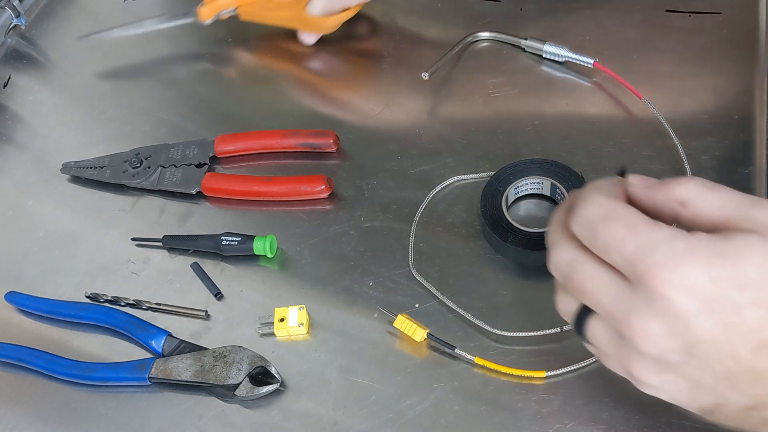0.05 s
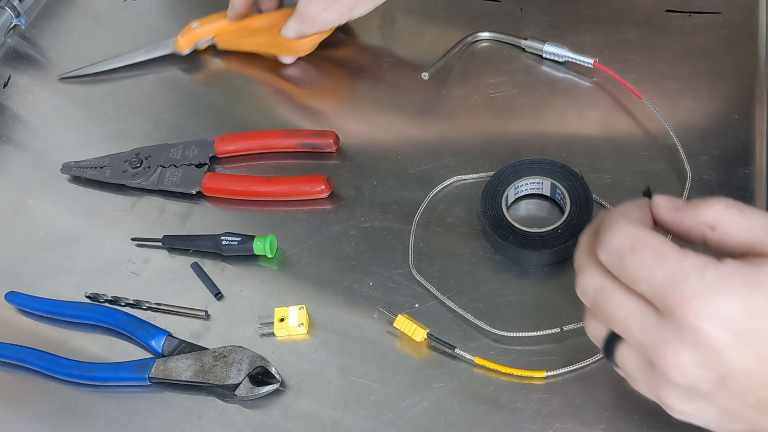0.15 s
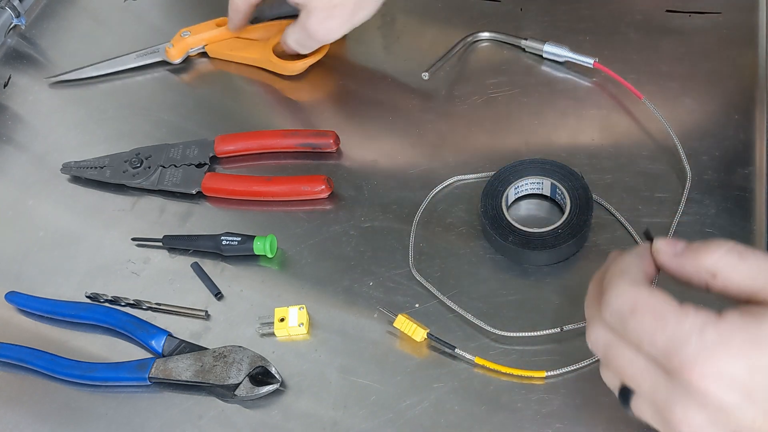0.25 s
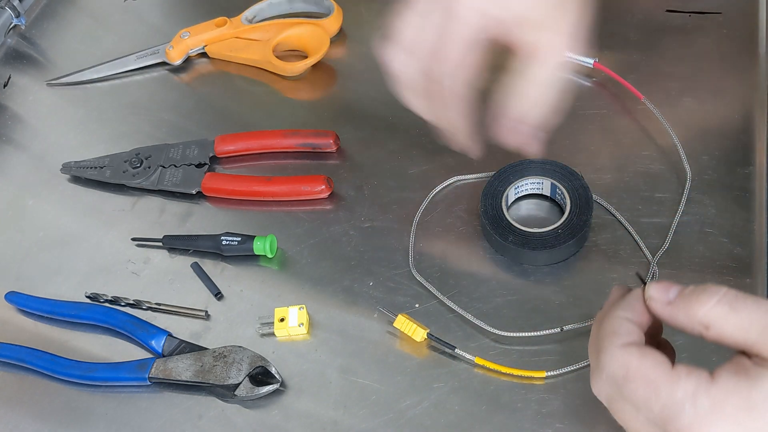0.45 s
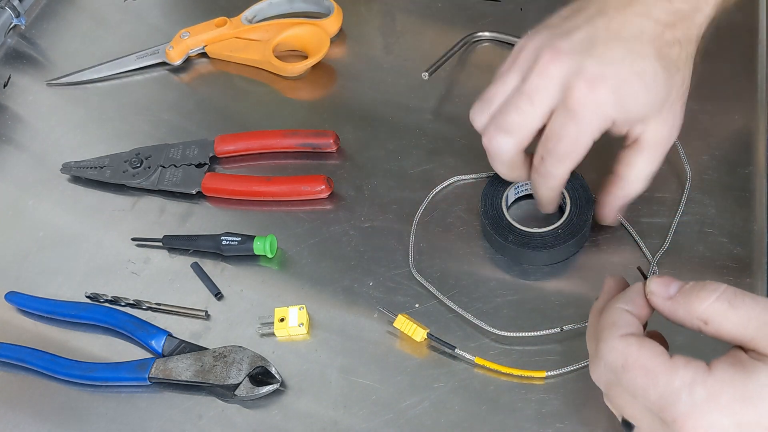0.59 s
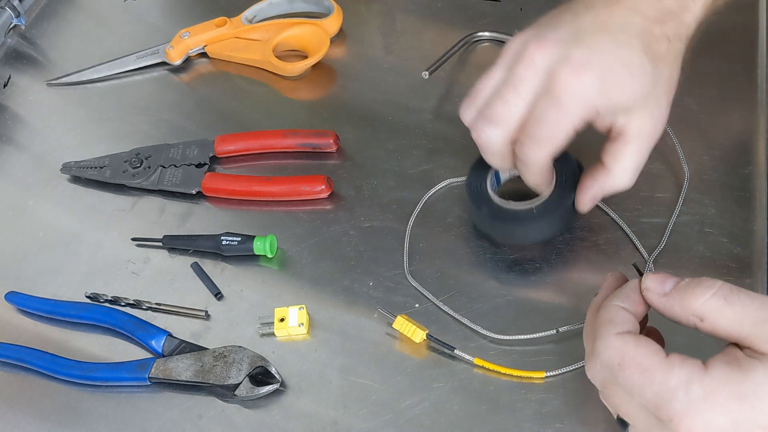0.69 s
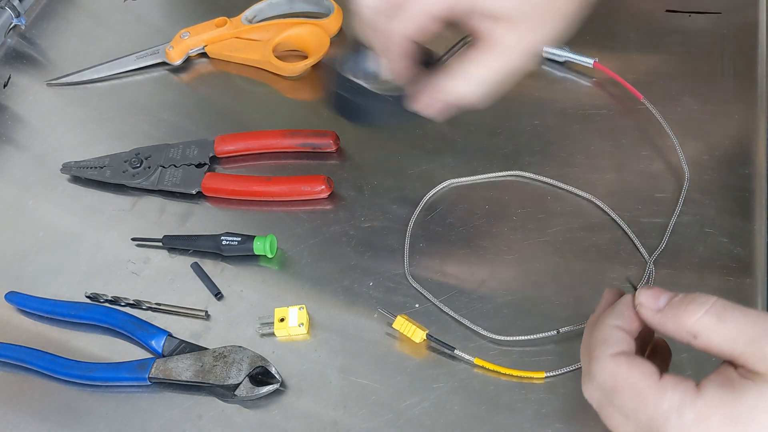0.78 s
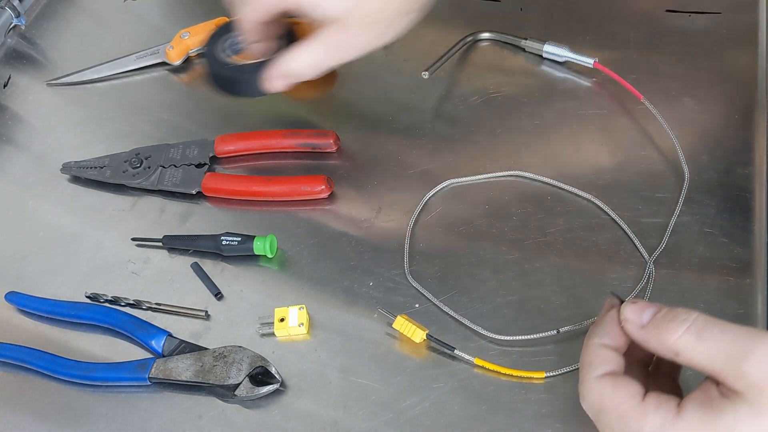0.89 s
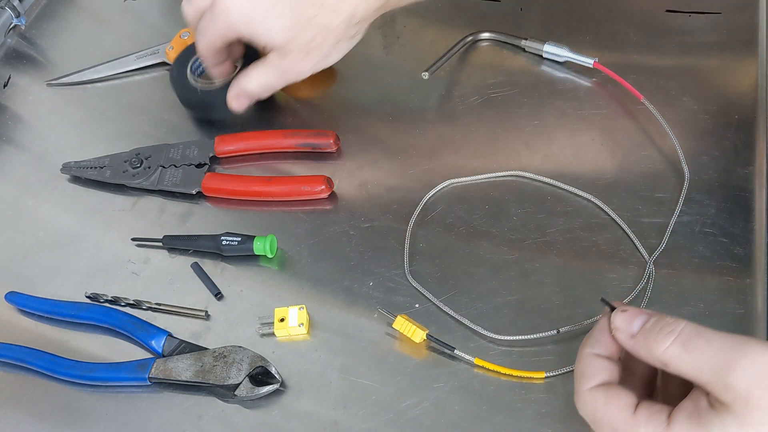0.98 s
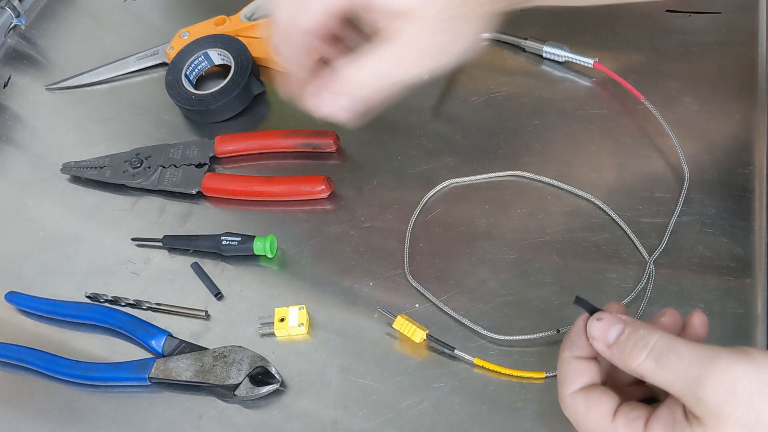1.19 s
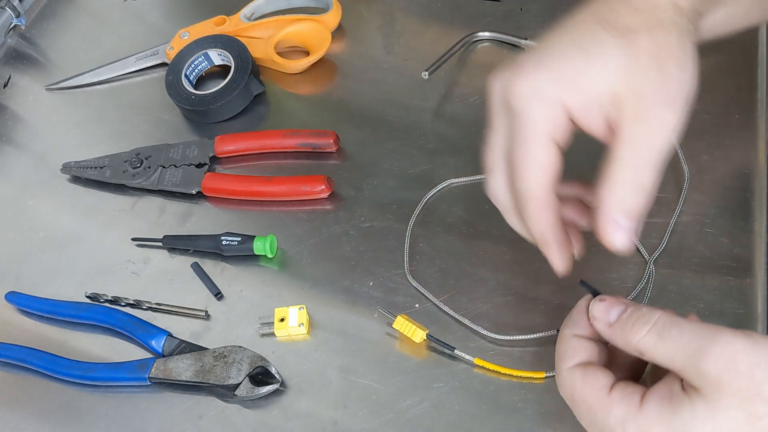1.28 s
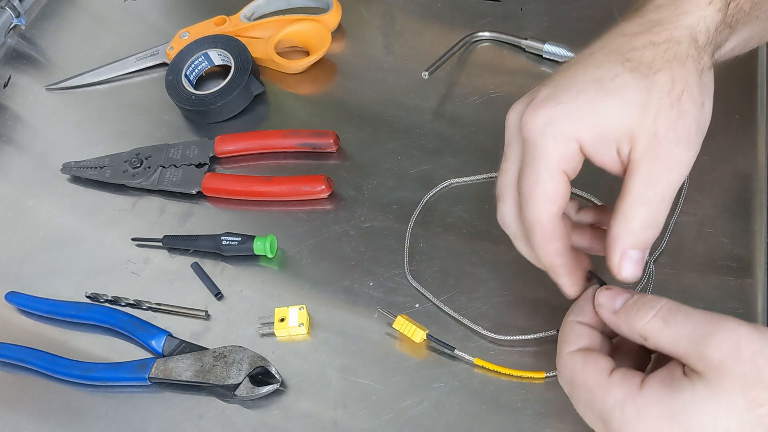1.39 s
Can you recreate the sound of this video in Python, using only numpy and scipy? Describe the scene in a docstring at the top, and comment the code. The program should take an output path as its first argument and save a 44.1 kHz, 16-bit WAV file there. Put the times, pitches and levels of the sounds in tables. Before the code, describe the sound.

Scissors clatter onto a stainless steel workbench, then a roll of tape knocks down against them and rocks to rest. The top rings briefly over a faint hum in a small workshop, with a stereo microphone close by.

```python
"""A small workshop, with a stereo microphone close to a stainless steel workbench. Scissors clatter onto the
top; then a roll of tape is set down against them and rocks to rest. Every contact is a short clack, the
object's own ring and a push that rings the steel top. The sheet shimmers and the room answers. Fingers brush
faintly twice as the hand takes up the tape, over a low hum of mains and motor and the rumble of ventilation."""
import sys
import numpy as np
from scipy import signal
from scipy.fft import rfft, irfft
from scipy.io import wavfile

SR = 44100
rng = np.random.default_rng(int(sys.argv[2]) if len(sys.argv) > 2 else 0)


def store_pcm(level_fs):
    """Save levels as 16-bit WAV."""
    pcm = np.round(np.clip(level_fs, -1, 1) * 32767).astype(np.int16)
    wavfile.write(sys.argv[1], SR, np.atleast_2d(pcm).T)


N = 63945
T = np.arange(N) / SR
FREQS = np.fft.rfftfreq(N, 1 / SR)
NEAR_ALIKE_HZ, ROOM_ALIKE_HZ = 1600, 900  # above these, left and right hear unlike sound


def undb(db):
    """Decibels to gain."""
    return 10 ** (np.asarray(db) / 20)


def unit(x):
    """Scale each channel to unit energy."""
    return x / np.sqrt(np.sum(x ** 2, axis=-1, keepdims=True))


def lookup(table, hz, column=1):
    """One column of a table, read on a log-frequency axis."""
    rows = np.array(table, float)
    return np.interp(np.log(np.maximum(hz, 1)), np.log(rows[:, 0]), rows[:, column])


def stereo_spectrum(alike_hz):
    """Spectrum of white noise at the microphone: sides alike in the bass, unrelated in the treble."""
    mid, side = rfft(rng.standard_normal((2, N)))
    alike = 1 / (1 + (FREQS / alike_hz) ** 2)
    return mid * np.sqrt(1 + alike) + side * np.sqrt(1 - alike) * np.array([[1], [-1]])


def steady_noise(colour, alike_hz):
    """Steady coloured stereo noise of unit RMS."""
    spectrum = stereo_spectrum(alike_hz) * undb(lookup(colour, FREQS))
    return unit(irfft(spectrum, N)) * np.sqrt(N)


def dense_rings(bands, alike_hz, count, size, swell_cycles=0.52):
    """Bursts of crowded modes: each quarter-octave of noise dies at its own rate; lows build late."""
    spectrum, bursts = stereo_spectrum(alike_hz), 0
    half_band = 2 ** (1 / 8)
    for hz in 50 * 2 ** (np.arange(35) / 4):
        inside = (FREQS >= hz / half_band) & (FREQS < hz * half_band)
        band = irfft(spectrum * inside, N)[:, :count * size].reshape(2, count, size)
        swell = 1 - np.exp(-T[:size] * hz / swell_cycles)
        fade = undb(-60 * T[:size] / lookup(bands, hz, column=2))
        gain = undb(lookup(bands, hz)) * np.sqrt(inside.mean())
        bursts = bursts + gain * unit(band * swell * fade)
    return bursts.transpose(1, 0, 2)


def ring(modes, size=22000, scatter_db=1):
    """Decaying modes whose strengths vary from blow to blow."""
    hz, db, t60 = np.array(modes, float).T[:, :, None]
    waves = unit(np.sin(2 * np.pi * hz * T[:size]) * undb(-60 * T[:size] / t60))
    signs = (-1) ** np.arange(len(hz))[:, None]  # neighbours swing opposite ways: the ring swells in
    strengths = undb(db + scatter_db * rng.standard_normal(hz.shape))
    return np.sum(signs * waves * strengths, axis=0)


def tail(sound, bands, alike_hz, build_s):
    """Diffuse ringing that builds up briefly after each sound."""
    response = dense_rings(bands, alike_hz, count=1, size=N)[0] * (1 - np.exp(-T / build_s))
    return signal.fftconvolve(sound, response, axes=1)[:, :N]


def ventilation_and_hum():
    """Room tone: moving air rumbles under the hum of mains and motor."""
    # Ventilation noise. Each row: frequency in Hz, relative level in dB per Hz.
    air_colour = [(22, -11), (40, -4), (62, 4), (95, 4.5), (135, 0.5), (165, -10.5), (230, -10), (340, -19),
                  (500, -21), (1100, -21.5), (2500, -29), (5000, -36), (10500, -40), (15000, -43.5)]
    # Hum tones. Each row: frequency in Hz, RMS level in dB.
    tones = [(119.8, -75.5), (91, -71), (456, -78)]
    hum = sum(undb(db) * np.sqrt(2) * np.sin(2 * np.pi * (hz * T + rng.random())) for hz, db in tones)
    return undb(-49.5) * steady_noise(air_colour, ROOM_ALIKE_HZ) + hum


def fingers():
    """Faint swells of skin sliding on plastic."""
    # Brushes as the hand takes up the tape. Each row: centre in seconds, length in seconds, level in dB.
    brushes = [(0.053, 0.082, -62.5), (0.684, 0.029, -64.5)]
    # Friction hiss. Each row: frequency in Hz, relative level in dB per Hz.
    colour = [(500, -20), (2500, -14), (6000, 0), (10500, -5.5), (14500, -0.5)]
    swell = sum(undb(db) * np.exp(-(2 * (T - at_s) / length_s) ** 2) for at_s, length_s, db in brushes)
    return swell * steady_noise(colour, NEAR_ALIKE_HZ)


def bench_contacts(hits, clack, modes, clack_db, left_lag_s, snaps=False):
    """Each contact clacks, rings the object's own modes and pushes the bench; hard ones also snap."""
    # Modes of the steel top. Each row: frequency in Hz, level in dB, T60 in seconds.
    bench_modes = [(67.3, -9, 0.43), (120, -8, 0.28), (207.5, -6, 0.27), (309.5, -22.5, 0.22),
                   (413, -15, 0.4), (469.8, -12.5, 0.33), (530, -9, .12), (569.3, -6.5, .11),
                   (613.3, -5.5, 0.11), (739, -11, 0.096), (872, -15, 0.22), (1006, -8, 0.15),
                   (1309, -12.5, 0.18), (1481, -22.5, 0.2)]
    out = np.zeros((2, N))
    bursts = dense_rings(clack, NEAR_ALIKE_HZ, count=len(hits), size=3000)
    snap_hz, snap_db = 6000, -5  # the first swing of a contact on bare steel
    snap = unit(np.cos(2 * np.pi * snap_hz * T) * np.exp(-2 * snap_hz * T))
    for (start_s, db, edge_hz, push_db, pan_db), burst in zip(hits, bursts):
        ringing = undb(push_db) * ring(bench_modes) + undb(db) * ring(modes)
        hit = np.tile(ringing, (2, 1))
        hit[:, :burst.shape[1]] += undb(db + clack_db) * unit(burst)
        if snaps:
            hit += undb(db + snap_db) * snap[:len(ringing)]
        softness = signal.butter(2, edge_hz, fs=SR, output="sos")  # a softer contact loses its treble
        pan = undb(np.array([[pan_db], [-pan_db]]) / 2)
        hit = pan * signal.sosfilt(softness, hit)
        start = round(start_s * SR)
        out[:, start:start + len(ringing)] += hit[:, :N - start]
    out[0] = np.roll(out[0], round(left_lag_s * SR))
    return out


def scissor_taps():
    """Hard contacts snap and ring the blades, as the scissors land and again when the tape meets them."""
    # Taps. Each row: start in seconds, level in dB, treble edge in Hz, push on the bench in dB,
    # left minus right in dB.
    taps = [(.2046, 1, 16900, -4, 1.5), (.2214, -9.5, 15700, -8, -8), (.2290, -14, 10200, -33, 15),
            (.2311, -3.5, 10400, -9, 4), (.2445, -8, 15100, -2.5, -2), (.2495, -39, 10100, -29, 6),
            (.3772, -7, 14500, -4, 0.5), (.4008, -20, 7800, -5.5, -2.5), (.4052, -12.5, 14000, -24, -6),
            (.4270, -18.5, 9100, -10.5, -0.5), (.4312, -47, 9200, -11, 2),
            (.4557, -32, 11400, -27.5, -13.5), (.4745, -28.5, 9000, -57, -2), (1.0585, -22, 13700, -48, -3),
            (1.0830, -14.5, 9000, -5, 1.5), (1.0886, -12, 9400, -19, 0), (1.1190, -15.5, 7500, -16.5, 1),
            (1.1315, -27, 9150, -24, -5), (1.1925, -41.5, 12100, -26, -10)]
    # Metal clack. Each row: frequency in Hz, level in dB per Hz, T60 in seconds.
    clack = [(100, -10, 0.074), (380, -2, 0.052), (600, -4, 0.048), (845, -15.5, .04), (1200, 15.5, 0.012),
             (1650, 8.5, 0.032), (2585, 7.5, 0.037), (4500, 11, 0.019), (5420, 4, 0.015), (7130, 7, 0.013),
             (10650, 0.5, 0.024), (14260, 9.5, 0.015), (16600, 4.5, 0.012)]
    # Blade modes. Each row: frequency in Hz, level in dB, T60 in seconds.
    modes = [(568, -7.5, 0.066), (1217, -9.5, 0.072), (2077, -11, 0.07), (2620, -6.5, 0.024),
             (2960, -16, 0.033), (4217, -9.5, 0.022), (7210, -11, 0.013), (9300, -13, 0.02),
             (13000, -11, .016)]
    return bench_contacts(taps, clack, modes, clack_db=2.5, left_lag_s=0.00025, snaps=True)


def sheet_shimmer(near):
    """The crowded modes of the steel sheet ring on after each contact."""
    # Shimmer. Each row: frequency in Hz, level in dB per Hz, T60 in seconds.
    bands = [(100, -25, 0.11), (250, -4, 0.41), (550, -9.5, 0.21), (1400, -1.5, .15), (2700, -3.5, 0.11),
             (4540, -6, .13), (8000, -4, 0.075), (16000, -3, 0.15)]
    return tail(near, bands, alike_hz=1487, build_s=0.015)


def room_reverb(near):
    """The workshop returns each contact as a diffuse tail."""
    # Reverberation. Each row: frequency in Hz, level in dB per Hz, T60 in seconds.
    bands = [(100, -30, .4), (250, -1.5, .4), (610, -11, 0.59), (1370, -6, 0.74), (2640, -8.5, .75),
             (4400, -14, .65), (7950, -18, 0.55), (16000, -16.5, .35)]
    return tail(near, bands, ROOM_ALIKE_HZ, build_s=0.036)


def handle_slaps():
    """The plastic handles slap brightly onto the steel."""
    # Slaps. Each row: start in seconds, level in dB, treble edge in Hz, push on the bench in dB,
    # left minus right in dB.
    slaps = [(.2311, 1.5, 10000, -21, 4), (.2335, -8.5, 6890, -22.5, -19.5)]
    # Sharp plastic clack. Each row: frequency in Hz, level in dB per Hz, T60 in seconds.
    clack = [(100, -12, 0.071), (597, -1.5, .05), (950, -0.5, 0.053), (2000, 1, 0.039), (3500, 1.5, 0.0095),
             (7000, -1, 0.048), (11000, -5.5, .015), (15700, -19, .015)]
    # Upper handle modes. Each row: frequency in Hz, level in dB, T60 in seconds.
    modes = [(893, -8, 0.045), (1417, -16.5, 0.032), (1712, -16.5, 0.027), (2660, -7.5, 0.047),
             (2717, -5.5, .045), (3535, -4, 0.039), (6074, -15.5, 0.028)]
    return bench_contacts(slaps, clack, modes, clack_db=4.5, left_lag_s=0.00013)


def handle_bumps():
    """The handles bump down again in softer, duller contacts."""
    # Bumps. Each row: start in seconds, level in dB, treble edge in Hz, push on the bench in dB,
    # left minus right in dB.
    bumps = [(.2660, -1.5, 1330, -6, -2), (.2805, -7, 1300, -9.5, -5), (.3495, -3, 1420, -15, 4.5),
             (.3545, -5.5, 1350, -18, -5.5), (.3895, -2.5, 1000, -22, 2)]
    # Dull plastic clack. Each row: frequency in Hz, level in dB per Hz, T60 in seconds.
    clack = [(100, -5, 0.02), (330, -7, 0.062), (444, 5, 0.11), (650, 4.5, 0.091), (810, -8, 0.12),
             (1470, -3.5, 0.05), (3050, -6, 0.028), (9000, -16.5, .02)]
    # Lower handle modes. Each row: frequency in Hz, level in dB, T60 in seconds.
    modes = [(499, -10.5, .05), (608, -5.5, 0.06), (659, -4.5, .055), (769, -15, 0.076)]
    return bench_contacts(bumps, clack, modes, clack_db=0.5, left_lag_s=0.00006)


def tape_roll():
    """The roll of tape lands and rocks to rest, knocking on the top."""
    # Knocks. Each row: start in seconds, level in dB, treble edge in Hz, push on the bench in dB,
    # left minus right in dB.
    knocks = [(1.0483, -7, 570, -26, -1), (1.0631, -5.5, 7100, -27, 1.5), (1.0706, -0.5, 2260, -7.5, -1.5),
              (1.0905, -6, 660, -11, 1), (1.1215, -6.5, 550, -9, -0.5)]
    # Clack of the roll. Each row: frequency in Hz, level in dB per Hz, T60 in seconds.
    clack = [(90, 0, 0.051), (210, -6, .07), (440, 7.5, 0.056), (683, -1, 0.031), (1340, 2, 0.027),
             (2500, -7, 0.012), (3440, -10, 0.072), (7060, -10.5, 0.06), (15000, -29, 0.03)]
    # Modes of the roll. Each row: frequency in Hz, level in dB, T60 in seconds.
    modes = [(203.2, -4, 0.36), (414, -14.5, 0.042), (508, -11.5, 0.032), (1325, -6.5, 0.076),
             (1323, -6.5, 0.023), (1731, -11, 0.034), (1926, -7.5, 0.11), (2504, -7, 0.025)]
    return bench_contacts(knocks, clack, modes, clack_db=2.5, left_lag_s=0.00017)


def scene():
    """Scissors, then tape, near the microphone; each reaches its left side a little late."""
    near = scissor_taps() + handle_slaps() + handle_bumps() + tape_roll()
    return near + sheet_shimmer(near) + room_reverb(near) + fingers() + ventilation_and_hum()


def record(dry):
    """The recorder cuts the deepest bass and the highest treble."""
    low_cut = signal.butter(3, 50, "highpass", fs=SR, output="sos")
    high_cut = signal.ellip(8, 0.2, 80, 15900, fs=SR, output="sos")
    return signal.sosfilt(high_cut, signal.sosfilt(low_cut, dry))


dry = scene()
out = record(dry)
store_pcm(out)
```